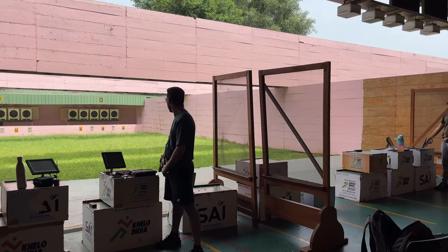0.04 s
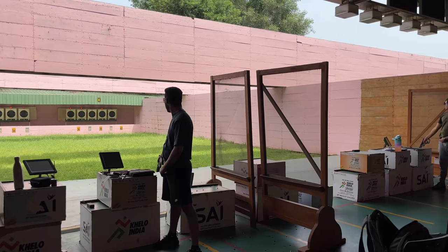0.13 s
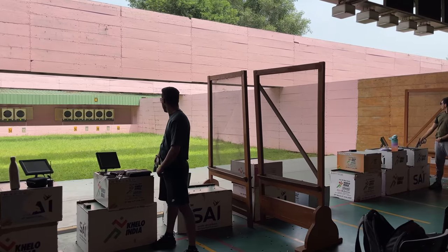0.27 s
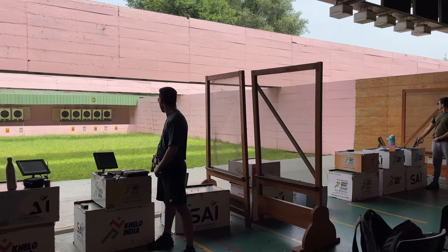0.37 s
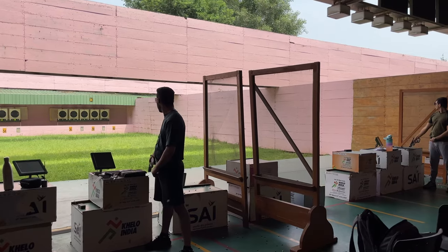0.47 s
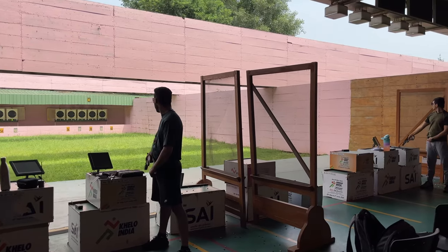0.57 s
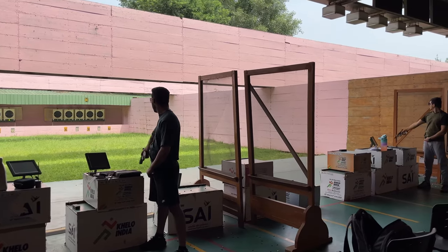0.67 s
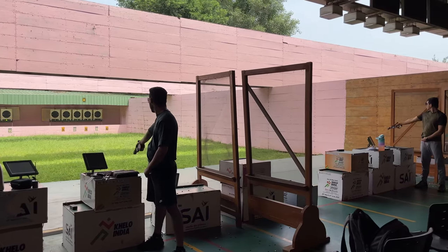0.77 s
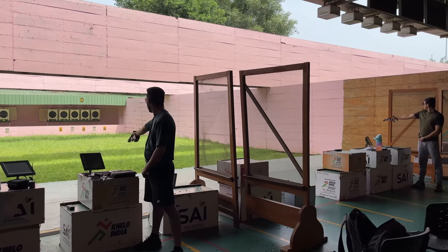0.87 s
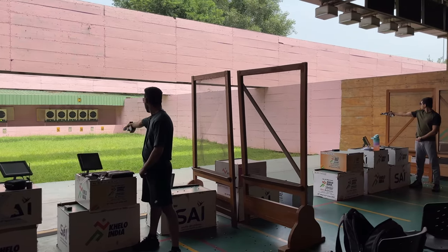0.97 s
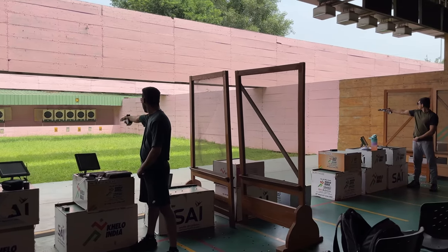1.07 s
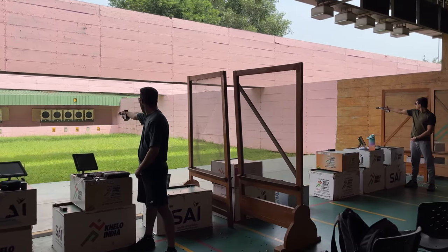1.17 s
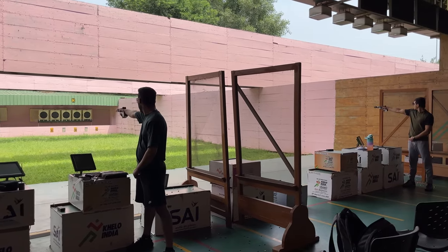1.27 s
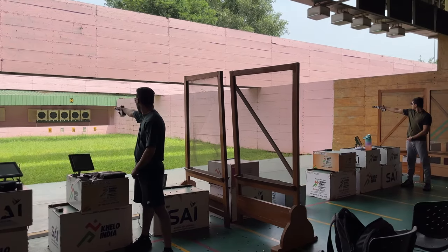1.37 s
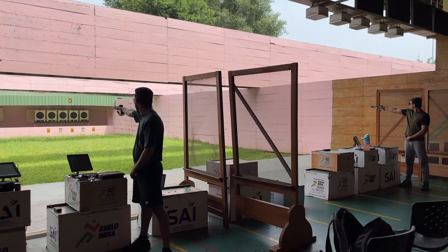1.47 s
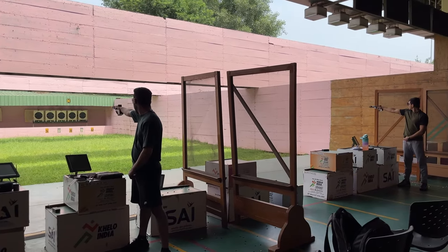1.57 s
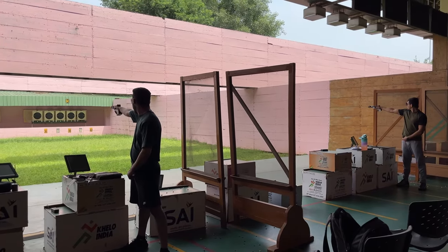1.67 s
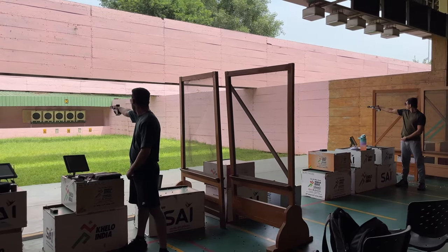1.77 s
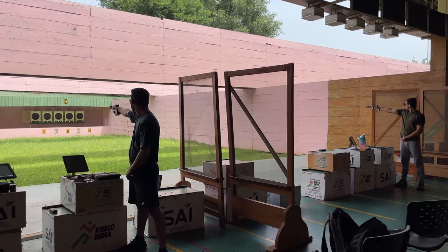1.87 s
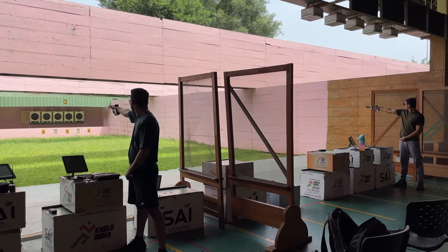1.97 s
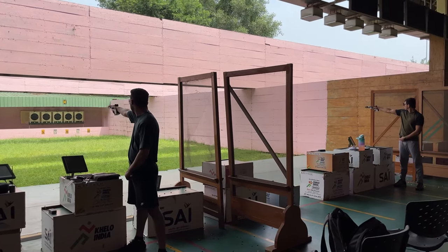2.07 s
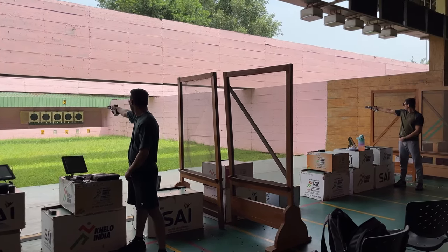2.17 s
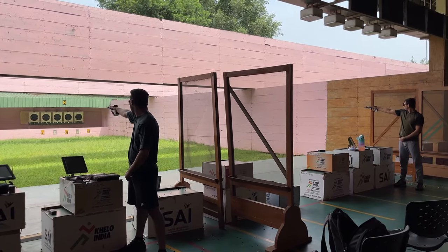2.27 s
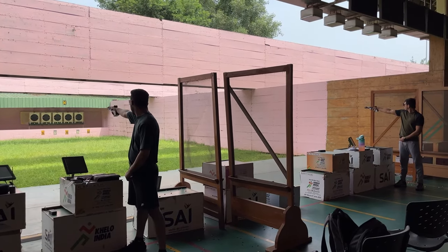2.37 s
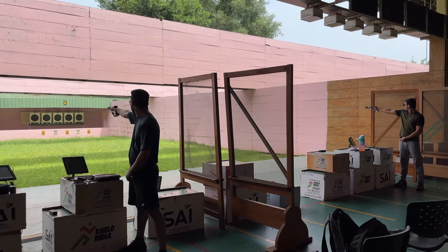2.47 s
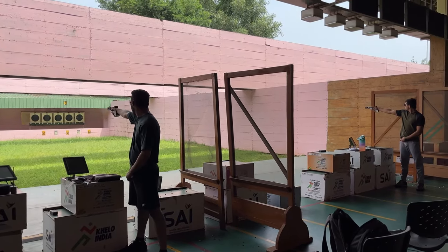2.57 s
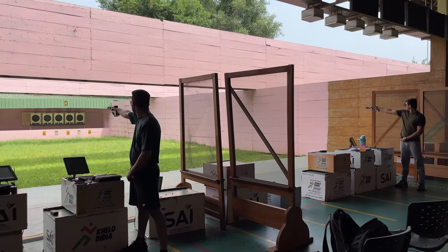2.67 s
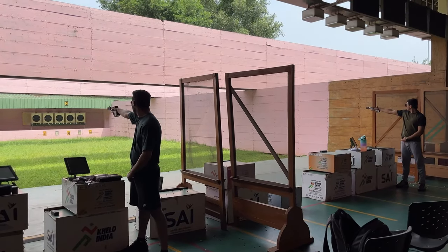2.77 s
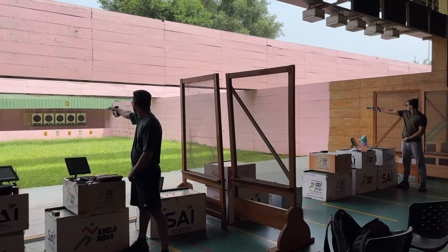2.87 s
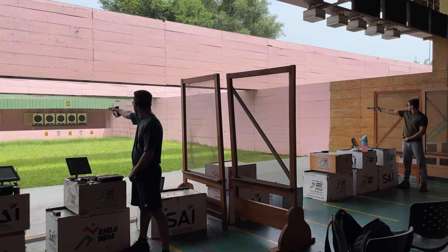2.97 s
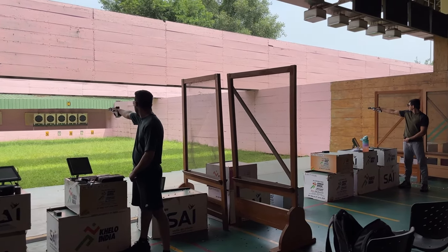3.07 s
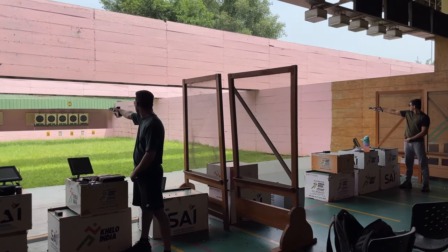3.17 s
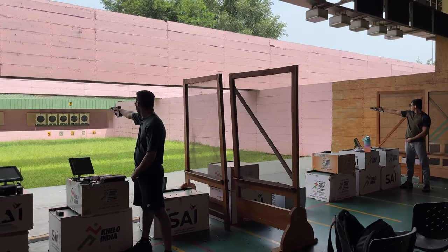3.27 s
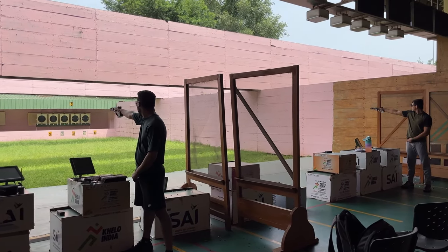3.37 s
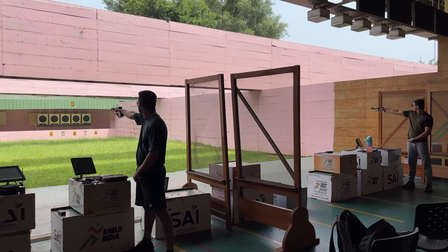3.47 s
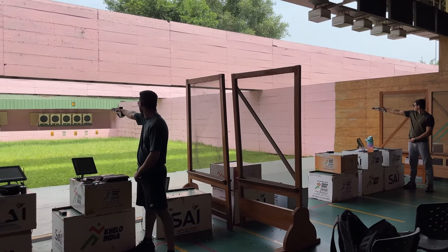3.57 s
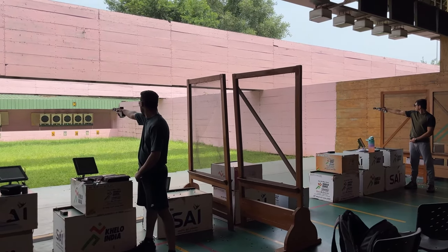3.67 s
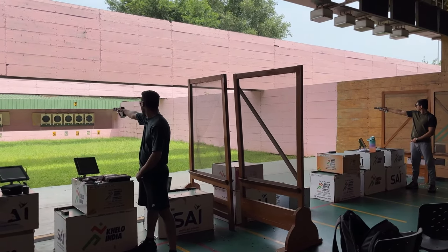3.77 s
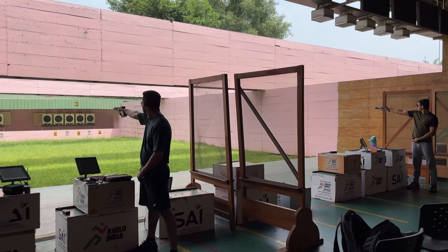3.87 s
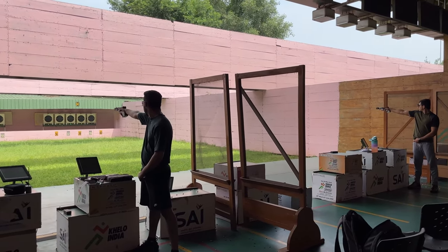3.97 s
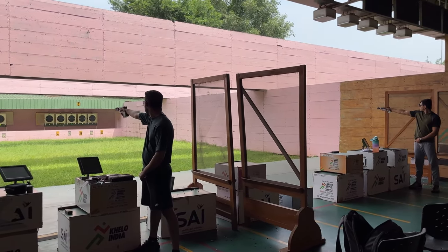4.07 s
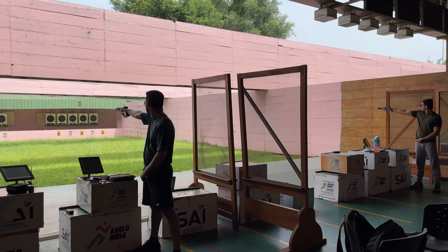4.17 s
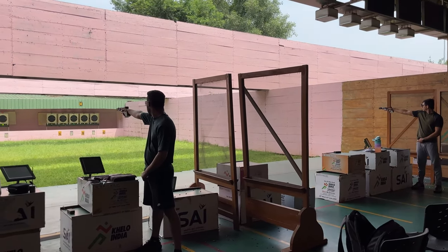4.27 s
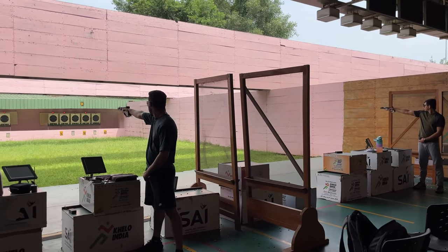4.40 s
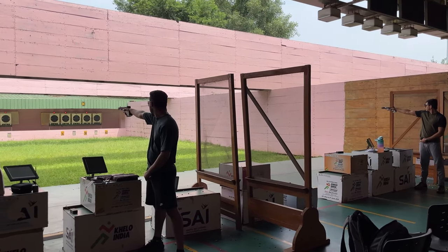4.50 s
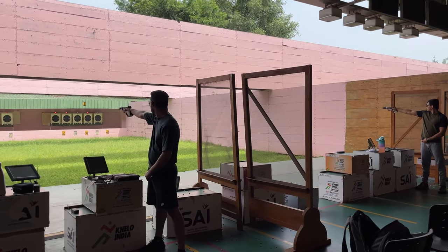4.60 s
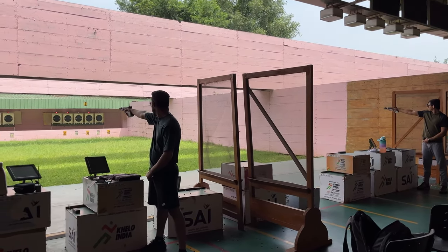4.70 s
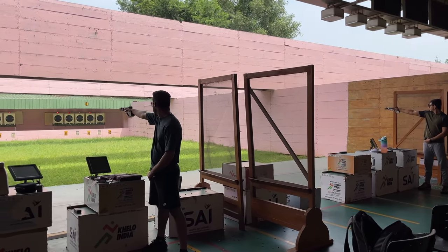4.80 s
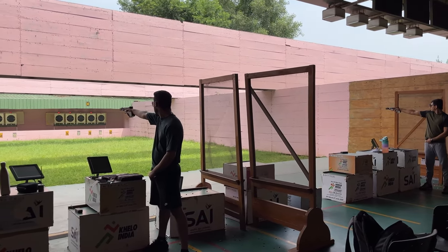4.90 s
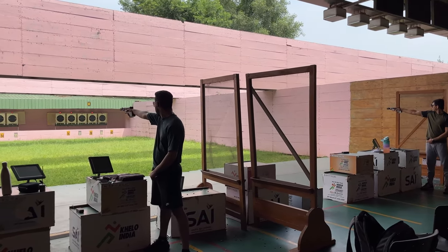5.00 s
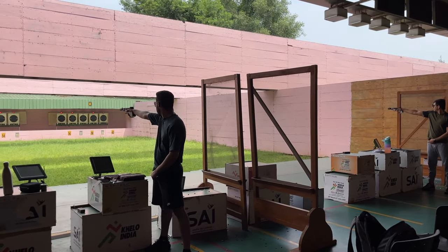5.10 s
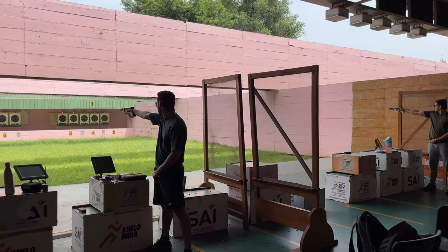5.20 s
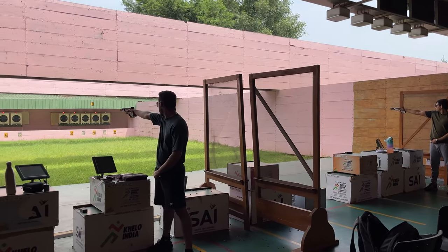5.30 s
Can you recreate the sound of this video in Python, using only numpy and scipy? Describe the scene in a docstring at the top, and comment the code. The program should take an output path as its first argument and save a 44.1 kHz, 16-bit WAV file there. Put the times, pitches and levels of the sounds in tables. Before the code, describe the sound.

Rapid pistol shots crack at close range, bunching into pairs and threes, with hard wall slaps and a continuous diffuse echo beneath.

```python
"""Rapid pistol cracks and booms, hard slaps off nearby walls and a long diffuse roar under a range roof.
Three near firing points share the strings; two faint shots come from a far one.
Cracks, slaps and booms are filtered clicks whose lows trail the highs; far baffles echo the boom, the roof air rings.
Roar, rumble and still air are band noise under power envelopes, all but the air decaying.
The stereo microphone hears it dull above 6 kHz, and the loudest peaks clip."""
import sys
import numpy as np
from scipy import signal
from scipy.fft import rfft, irfft, next_fast_len
from scipy.io import wavfile

SR = 44100
rng = np.random.default_rng(int(sys.argv[2]) if len(sys.argv) > 2 else 0)


def generate_wav(signal):
    """Clip the signal to [-1, 1] and save it as 16-bit WAV at the path in sys.argv[1]."""
    frames = np.transpose(np.atleast_2d(signal))
    scaled = np.clip(frames, -1, 1) * 32767
    pcm = np.round(scaled).astype(np.int16)
    wavfile.write(sys.argv[1], SR, pcm)


N = 235670

# Shots. Each row: start in seconds, firing point, crack peak in dB, boom peak in dB, late roar in dB at 1 kHz,
# brightness in dB per octave.
SHOTS = [(0.281, "far", -19, -43, -30, 1.4), (0.472, "first", -0.5, -12, -14.5, 0),
         (1.067, "first", -7.5, -32, -16, 0.05), (1.678, "first", -7, -31, -15.5, -0.1),
         (1.823, "second", 0.5, -7, -18, -0.76), (1.945, "third", -1, -8.5, -19, -0.38),
         (2.332, "first", -6.5, -37, -18.5, -0.14), (2.473, "second", -1.5, -18, -17.5, -0.36),
         (2.583, "third", -17, -19.5, -21.5, -0.02), (3.075, "second", -0.5, -16.5, -18.5, 0.18),
         (3.172, "third", 0.5, -17, -24, 0.85), (3.686, "second", -1, -15.5, -22, 1.2),
         (3.773, "third", 1, -21, -23, 0), (4.288, "second", -1, -50, -21.5, 1.04),
         (4.379, "third", 0, -38.5, -25, 0.7), (5.03, "far", -39, -70, -60, 2)]
# Firing points. Each row: crack left-right in dB, crack tilt in dB per octave, boom tilt in dB per octave,
# early roar over late in dB, roar left-right in dB, seconds until side walls are reached and late roar starts.
POINTS = {"first": (1.8, 1.7, 9.1, 0.24, 1.42, 0.023), "second": (-1.5, -0.54, -0.8, 3, 1.5, 0.015),
          "third": (2.9, 0.6, 0.48, 5.7, 2.1, 0.013), "far": (6, -0.9, -3, 0, 1.5, 0.013)}
# Wall slaps per firing point. Each row: delay in seconds, peak in dB, left-right in dB, tilt in dB per octave.
SLAPS = {"first": [(0.0285, -4, 6.5, -3.5), (0.042, -12, 1, -2)], "second": [(0.017, -14, 4, -1.5),
         (0.043, -13, 6.5, -2.5)], "third": [(0.011, -15, -8, 3.5), (0.041, -8, 1.5, -2.5),
         (0.048, -10.5, 6, -2)], "far": []}
# Crack and slap spectrum. Each row: frequency in Hz, density in dB per Hz.
CRACK = [(60, -38), (150, -19.5), (330, -4), (620, 0), (1100, 2.4), (1600, -8), (2140, -10.5), (2900, -6),
         (3900, -10), (4800, -19.5), (5800, -17), (7000, -32), (9600, -54), (16000, -110)]
# Boom spectrum. Each row: frequency in Hz, density in dB per Hz.
BOOM = [(25, -27.5), (40, -17), (54, 4), (70, 5), (110, 4), (170, -2.5), (260, -7.5), (450, -23),
        (800, -60.5)]
# Boom returned by far baffles. Each row: delay in seconds, level in dB relative to the boom.
BOOM_ECHO = [(0.07, -14.5), (0.138, -16.5)]
# Ring of the air under the roof. One row: frequency in Hz, level in dB, T60 in seconds.
ROOF_MODE = (53.2, -17.5, 0.33)
# Roar spectrum. Each row: frequency in Hz, density in dB per Hz.
ROAR = [(30, -47), (60, -23), (110, -12), (280, -7.5), (520, -4.5), (830, 1), (1550, -1.5), (1800, -7),
        (2200, -9), (3000, -6.5), (4800, -11), (5600, -14.5), (6900, -28), (9600, -52), (16000, -110)]
# Late roar decay. Each row: frequency in Hz, T60 in seconds.
LATE_T60 = [(50, 1.04), (150, 0.91), (400, 1.067), (1000, 1.33), (2000, 1.395), (3500, 1.52), (6000, 1.307),
            (8500, 1.04)]
# Roar still sounding from a shot before the start. One row: early part in dB, late part in dB.
EARLIER_ROAR_DB = (-28, -18)
# Roar likeness between sides. Each row: frequency in Hz, likeness from 0 to 1.
LIKENESS = [(50, 0.91), (125, 0.43), (250, 0.34), (500, 0.21), (1500, 0.083), (8000, 0.033)]
# Microphone pair's lean, applied to roar, rumble and air. Each row: frequency in Hz, left-right in dB.
LEAN = [(60, 14), (120, -3), (230, -0.5), (460, 3), (910, 0), (1780, -3), (3520, 2), (6930, 3)]

LEAD_S = 0.003  # pulse buffer starts this long before the blast
CRACK_PIVOT_HZ, BOOM_PIVOT_HZ, ROAR_PIVOT_HZ = 1000, 90, 1000
# Tilt per unit of brightness; the last applies to roar below its pivot.
CRACK_FOLLOWS_BRIGHTNESS, BOOM_FOLLOWS_BRIGHTNESS, LOW_ROAR_FOLLOWS_BRIGHTNESS = 0.82, 5.1, 1.45
EARLY_T60_S = 0.22
EARLY_LUMPS_DB, LATE_LUMPS_DB, LUMP_RATE_HZ = 3.0 / 2, 0.91 / 2, 76  # spread of bunched arrivals
BACKSTOP_S, BACKSTOP_DB, BACKSTOP_T60_S = 0.13, -3.5, 0.21  # smeared return, relative to late roar
BACKSTOP_HZ, BACKSTOP_CURVE_DB = 950, -7.3  # curve per squared octave
RUMBLE_DB, RUMBLE_T60_S, RUMBLE_TOP_HZ = -17.5, 0.55, 300  # relative to the boom
EARLIER_RUMBLE_DB = -31.5  # left by the boom of the shot before the start
AIR_DB, AIR_TILT_DB_PER_OCTAVE = -62, -2
MICROPHONE_TOP_HZ, CUTOFF_HZ, CONVERTER_OFFSET = 9500, 16000, 0.001


def from_db(db):
    """Decibels to amplitude gain."""
    return 10 ** (np.asarray(db) / 20)


def power_from_db(db):
    """Decibels to power gain."""
    return from_db(2 * np.asarray(db))


def at_hz(points, hz):
    """Read a table on a log-frequency axis."""
    table = np.array(points)
    return np.interp(np.log(hz), np.log(table[:, 0]), table[:, 1])


def sides(pan_db):
    """Left and right gains as a column."""
    return from_db(np.array([[0.5], [-0.5]]) * pan_db)


def add(out, wave, s):
    """Mix a wave in at a time."""
    at = round(s * SR)
    out[:, at:at + wave.shape[1]] += wave[:, :N - at]


def shots():
    """Columns of all shots with firing-point traits; a brighter shot has a thinner crack and boom."""
    rows = []
    for s, point, crack_db, boom_db, late_db, bright_db in SHOTS:
        pan_db, crack_tilt_db, boom_tilt_db, early_over_db, roar_pan_db, walls_s = POINTS[point]
        crack_tilt_db += CRACK_FOLLOWS_BRIGHTNESS * bright_db
        boom_tilt_db += BOOM_FOLLOWS_BRIGHTNESS * bright_db
        rows.append((s, crack_db, pan_db, crack_tilt_db, boom_db, boom_tilt_db,
                     late_db + early_over_db, late_db, bright_db, roar_pan_db, walls_s))
    names = ("s", "crack_db", "pan_db", "crack_tilt_db", "boom_db", "boom_tilt_db",
             "early_db", "late_db", "roar_tilt_db", "roar_pan_db", "walls_s")
    return dict(zip(names, np.transpose(rows)))


def pulse(spectrum, tilt_db, pivot_hz, turns, scatter_s, scatter_db, size=4096):
    """Coloured click amid close random reflections, peak 1; each pitch lags by `turns` of its own cycles."""
    t = np.arange(size) / SR
    swell = t / scatter_s * np.exp(1 - t / scatter_s)
    shared = 0.89 * rng.standard_normal(size)
    click = from_db(scatter_db) * swell * (rng.standard_normal((2, size)) + shared)
    # small surfaces return no lows
    click = signal.sosfilt(signal.butter(1, 600, "high", fs=SR, output="sos"), click)
    click[:, round(scatter_s * SR)] += 1

    hz = np.maximum(np.arange(size // 2 + 1) * SR / size, 10)
    octaves = np.log2(np.maximum(hz / pivot_hz, 0.4))
    gain = from_db(at_hz(spectrum, hz) + tilt_db * octaves)
    lag = np.exp(-2j * np.pi * (turns * np.log(hz) + hz * LEAD_S))
    wave = irfft(rfft(click) * gain * lag)
    wave *= np.clip(np.minimum(t, t[::-1]) / LEAD_S, 0, 1) ** 2  # fade both ends
    return wave / np.abs(wave).max()


def muzzle_cracks():
    """Sharp muzzle blasts, lows trailing the highs."""
    out = np.zeros((2, N))
    shot = shots()
    columns = zip(shot["s"], shot["crack_db"], shot["pan_db"], shot["crack_tilt_db"])
    for s, peak_db, pan_db, tilt_db in columns:
        crack = pulse(CRACK, tilt_db, CRACK_PIVOT_HZ, turns=1.5, scatter_s=0.001327, scatter_db=-9)
        add(out, from_db(peak_db) * sides(pan_db) * crack, s - LEAD_S)
    return out


def muzzle_booms():
    """Low-frequency part of each blast, nearly free of scatter."""
    out = np.zeros((2, N))
    shot = shots()
    for s, peak_db, tilt_db in zip(shot["s"], shot["boom_db"], shot["boom_tilt_db"]):
        boom = pulse(BOOM, tilt_db, BOOM_PIVOT_HZ, turns=1.5, scatter_s=0.0012, scatter_db=-42)
        add(out, from_db(peak_db) * boom, s - LEAD_S)
    return out


def wall_slaps():
    """Cracks returned by the nearest walls with later-swelling scatter, at fixed levels per firing point."""
    out = np.zeros((2, N))
    for s, point, *_ in SHOTS:
        for delay_s, peak_db, pan_db, tilt_db in SLAPS[point]:
            slap = pulse(CRACK, tilt_db, CRACK_PIVOT_HZ, turns=1.15, scatter_s=0.001774, scatter_db=-15)
            add(out, from_db(peak_db) * sides(pan_db) * slap, s - LEAD_S + delay_s)
    return out


def baffle_echoes(booms):
    """Booms back from far baffles, their upper part lost."""
    out = np.zeros((2, N))
    for delay_s, echo_db in BOOM_ECHO:
        add(out, from_db(echo_db) * booms, delay_s)
    return signal.sosfilt(signal.butter(2, 90, fs=SR, output="sos"), out + 1e-18)


def roof_ring(booms):
    """Damped resonance of the air under the roof, driven by the booms."""
    hz, mode_db, t60_s = ROOF_MODE
    r = from_db(-60 / (t60_s * SR))
    w = 2 * np.pi * hz / SR
    ring = signal.lfilter([0, w * np.sin(w)], [1, -2 * r * np.cos(w), r * r], booms + 1e-18)
    return from_db(mode_db) * ring


def blasts():
    """Direct cracks and booms with their discrete returns."""
    booms = muzzle_booms()
    return muzzle_cracks() + wall_slaps() + booms + baffle_echoes(booms) + roof_ring(booms)


def dying(power, t60_s):
    """Each deposit of sound power fades exponentially."""
    return signal.lfilter([1], [1, -power_from_db(-60 / (t60_s * SR))], power + 1e-18)


def drift(rate_hz):
    """Noise low-passed by two equal poles at a rate, spread 1, computed every 20 samples."""
    r = np.exp(-2 * np.pi * rate_hz * 20 / SR)
    slow = signal.lfilter([1], [1, -2 * r, r * r], rng.standard_normal(N // 20 + 2002))[2000:]
    return np.interp(np.arange(N) / 20, np.arange(len(slow)), slow / slow.std())


def roar_power(hz, shot, at, lumps):
    """Quick early and slow late reflections plus the far bank's smeared mid-range return."""
    early, late, far = np.zeros((3, 2, N))
    later = at + np.round(shot["walls_s"] * SR).astype(int)
    octaves = np.log2(hz / ROAR_PIVOT_HZ)
    follow = LOW_ROAR_FOLLOWS_BRIGHTNESS if octaves < 0 else 1
    colour = from_db(shot["roar_tilt_db"] * octaves * follow) * sides(shot["roar_pan_db"])
    early[:, at] = (colour * from_db(shot["early_db"])) ** 2
    late[:, later] = (colour * from_db(shot["late_db"])) ** 2
    early[:, 0], late[:, 0] = power_from_db(EARLIER_ROAR_DB)

    bank_db = BACKSTOP_DB + BACKSTOP_CURVE_DB * np.log2(hz / BACKSTOP_HZ) ** 2
    far[:, at + round(BACKSTOP_S * SR)] = late[:, later] * power_from_db(bank_db)
    quick = dying(early, EARLY_T60_S) * power_from_db(EARLY_LUMPS_DB * lumps)
    slow = dying(late, at_hz(LATE_T60, hz)) + dying(far, BACKSTOP_T60_S)
    return quick + slow * power_from_db(LATE_LUMPS_DB * lumps)


def rumble_power(hz, shot, at):
    """Low roar under the roof after each boom, relative to the roar noise's spectrum."""
    rumble = np.zeros((2, N))
    spectrum_db = at_hz(BOOM, hz) - at_hz(ROAR, hz)
    tilt_db = shot["boom_tilt_db"] * np.log2(hz / BOOM_PIVOT_HZ)
    rumble[:, at] = power_from_db(shot["boom_db"] + spectrum_db + tilt_db + RUMBLE_DB)
    rumble[:, 0] = power_from_db(EARLIER_RUMBLE_DB + spectrum_db)
    return dying(rumble, RUMBLE_T60_S)


def air_power(hz):
    """Steady still-air noise, relative to the roar noise's spectrum."""
    return power_from_db(AIR_DB + AIR_TILT_DB_PER_OCTAVE * np.log2(hz / 1000))


def roar_hiss():
    """Two stereo noises with the roar's spectrum, overall spread 1."""
    size = next_fast_len(N)
    hz = np.maximum(np.arange(size // 2 + 1) * SR / size, 10)
    spectrum = rfft(rng.standard_normal((2, 2, size))) * from_db(at_hz(ROAR, hz))
    hiss = irfft(spectrum, size)[..., :N]
    return hiss / hiss.std()


def reverberation_and_air():
    """Third-octave noise bands shaped by roar, rumble and air power; lows build up more slowly."""
    shot = shots()
    at = np.round((shot["s"] + 0.0012) * SR).astype(int)
    hiss, lumps = roar_hiss(), drift(LUMP_RATE_HZ)  # arrivals bunch in all bands at once
    edges_hz = 32 * 2 ** (np.arange(26) / 3)
    out = np.zeros((2, N))
    for k, (low_hz, high_hz) in enumerate(zip(edges_hz, edges_hz[1:])):
        hz = np.sqrt(low_hz * high_hz)
        power = roar_power(hz, shot, at, lumps) + air_power(hz)
        if hz < RUMBLE_TOP_HZ:
            power += rumble_power(hz, shot, at)
        build = np.exp(-1 / (SR * (0.007 + 0.34 / hz)))
        power = signal.lfilter([1 - build], [1, -build], power, zi=build * power[:, :1])[0]

        band = signal.butter(2, [low_hz, high_hz], "band", fs=SR, output="sos")
        mid, side = signal.sosfilt(band, hiss[k % 2])  # neighbouring bands use different noise
        alike = np.clip(at_hz(LIKENESS, hz), 0, 1)
        noise = np.sqrt(1 + alike) * mid + np.sqrt(1 - alike) * side * [[1], [-1]]
        out += np.sqrt(power / 2) * noise * sides(at_hz(LEAN, hz))
    return out


def scene():
    """Blasts over their reverberation and still air."""
    return blasts() + reverberation_and_air()


def record(dry):
    """Microphone rolls off above its top, peaks clip, clipping splash is cut at the band edge."""
    heard = signal.sosfilt(signal.butter(10, MICROPHONE_TOP_HZ, fs=SR, output="sos"), dry)
    clipped = np.clip(heard + CONVERTER_OFFSET, -0.99, 0.99)
    return signal.sosfilt(signal.cheby2(12, 70, CUTOFF_HZ, fs=SR, output="sos"), clipped)


dry = scene()
out = record(dry)
generate_wav(out)
```